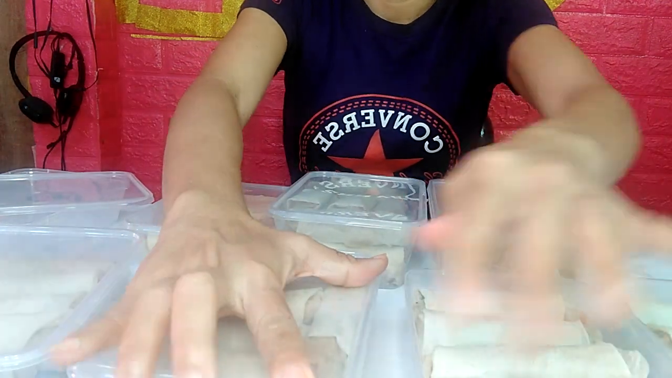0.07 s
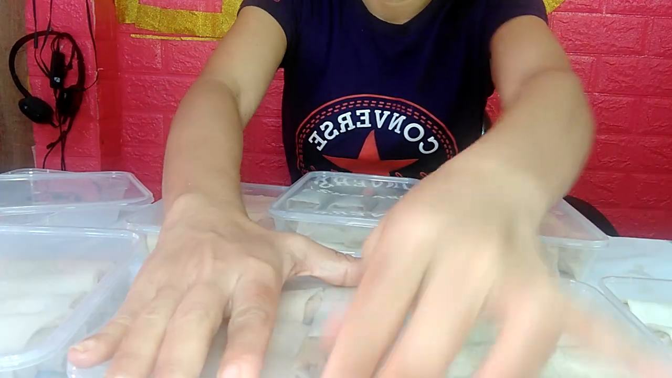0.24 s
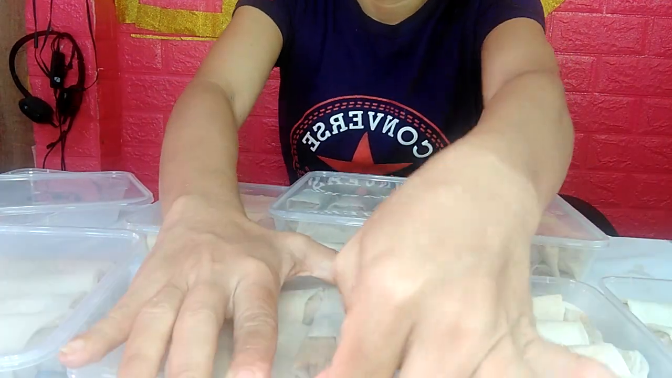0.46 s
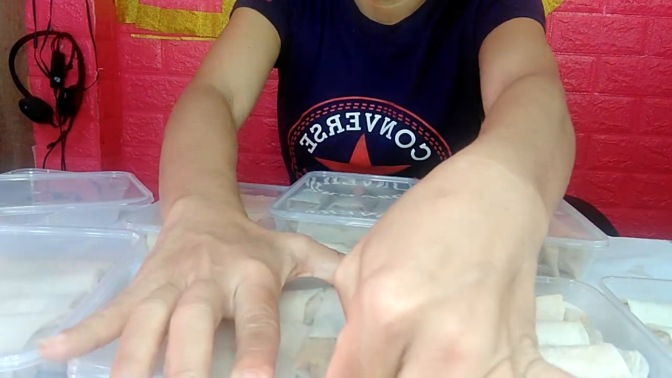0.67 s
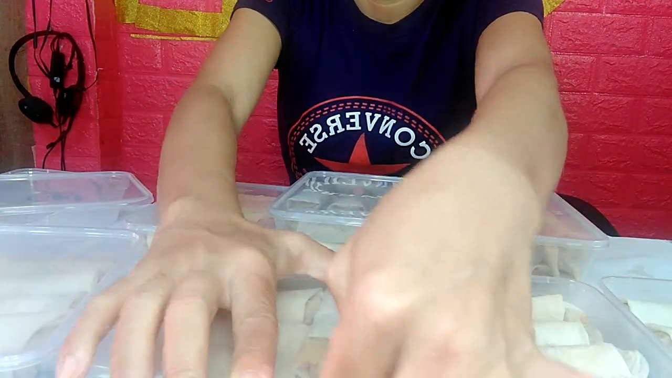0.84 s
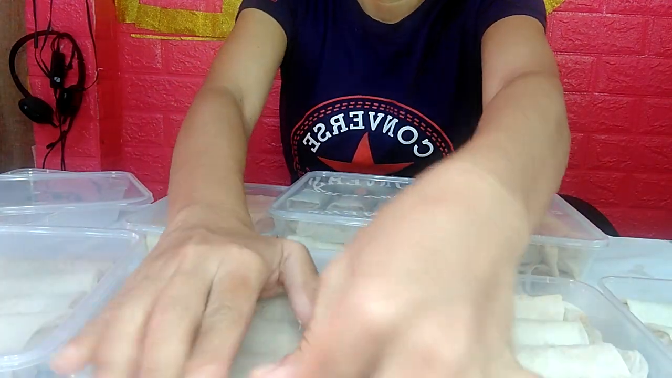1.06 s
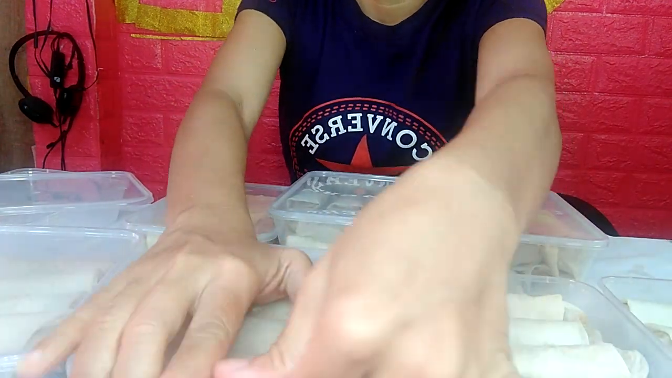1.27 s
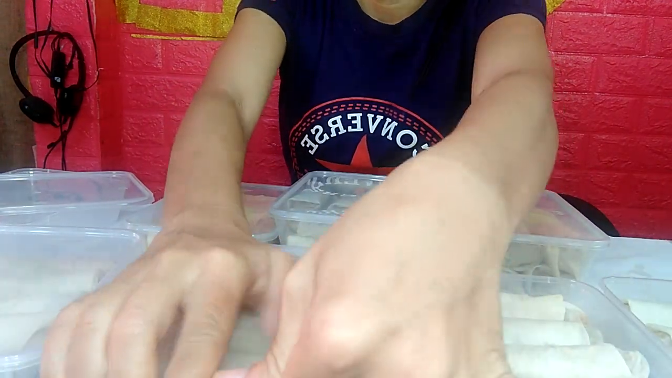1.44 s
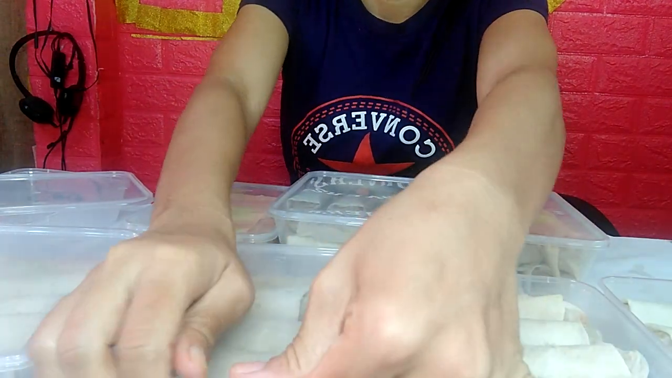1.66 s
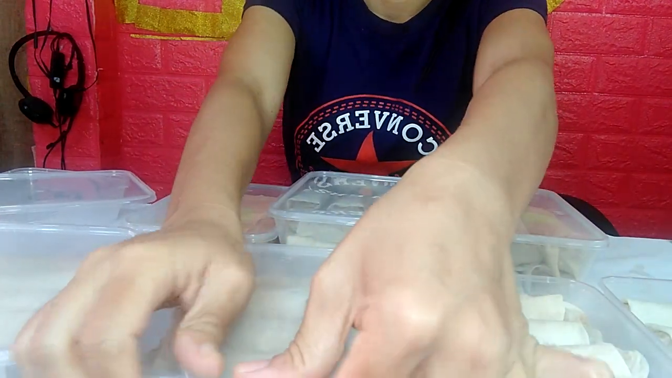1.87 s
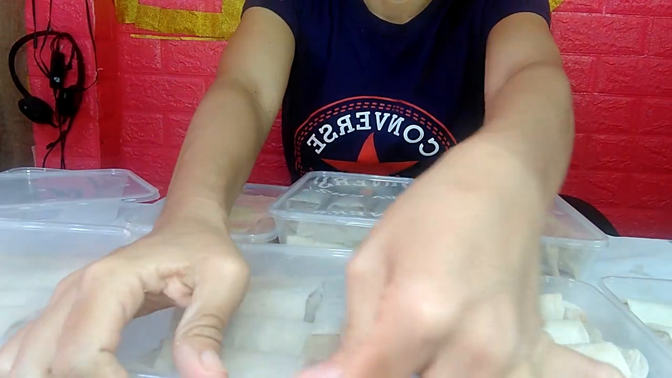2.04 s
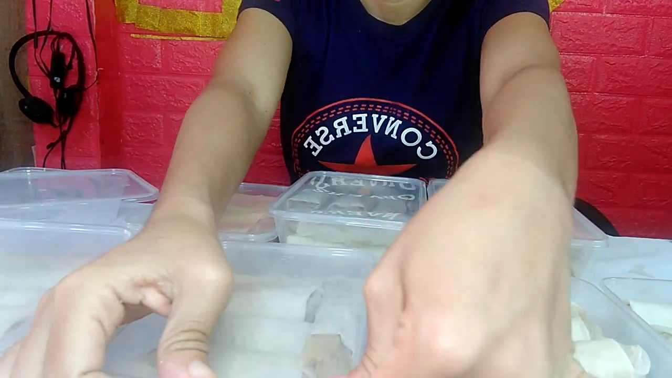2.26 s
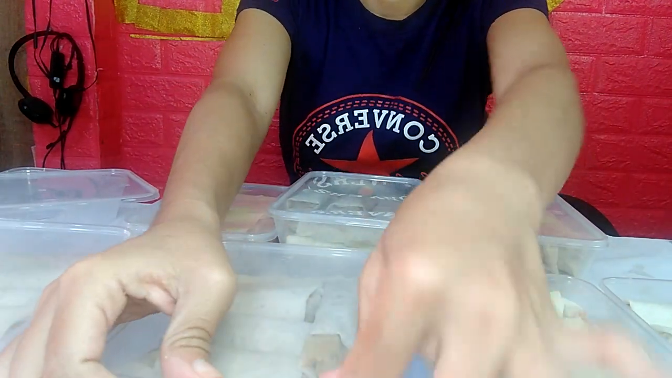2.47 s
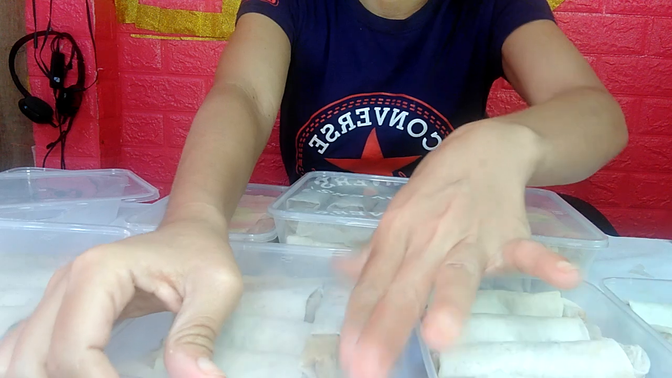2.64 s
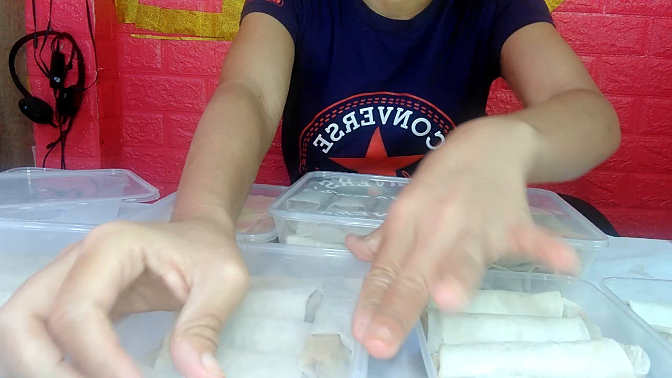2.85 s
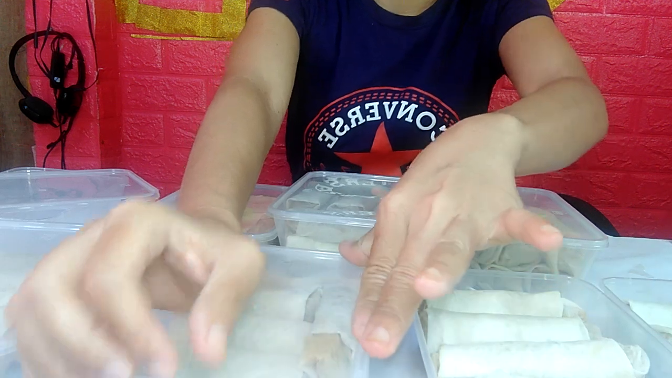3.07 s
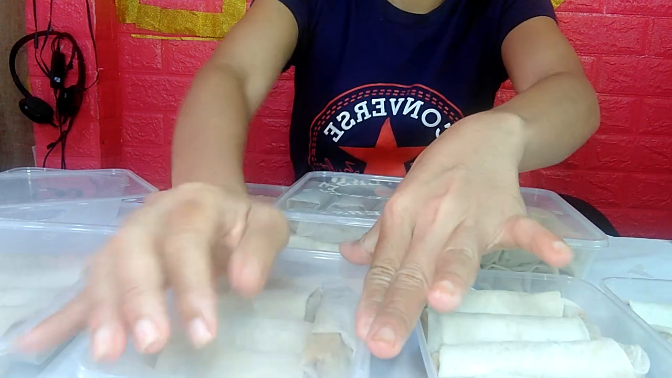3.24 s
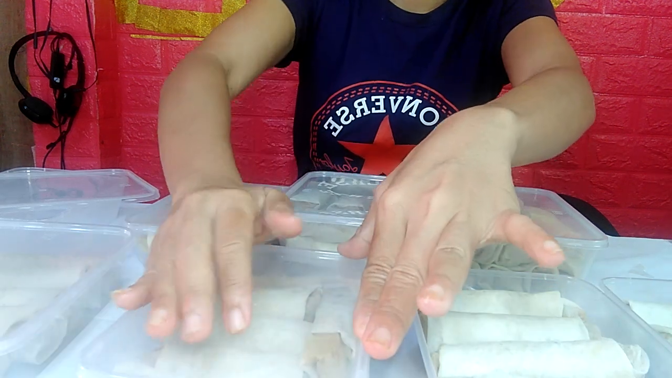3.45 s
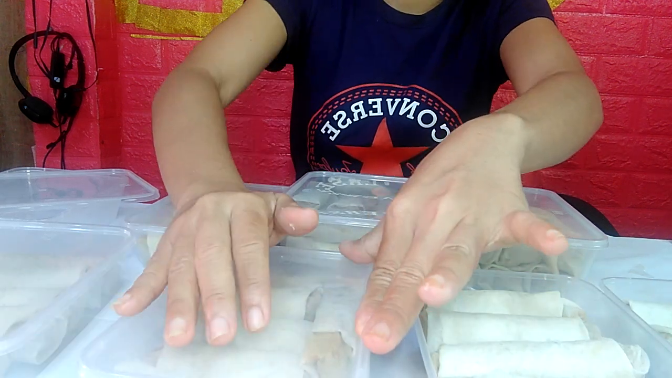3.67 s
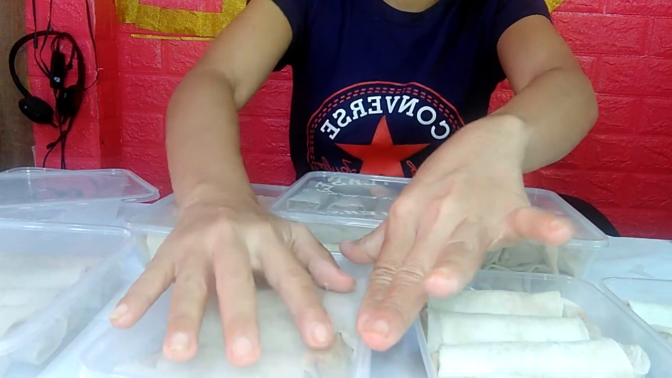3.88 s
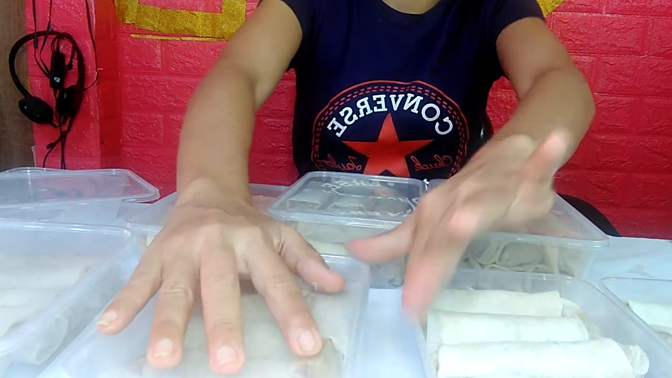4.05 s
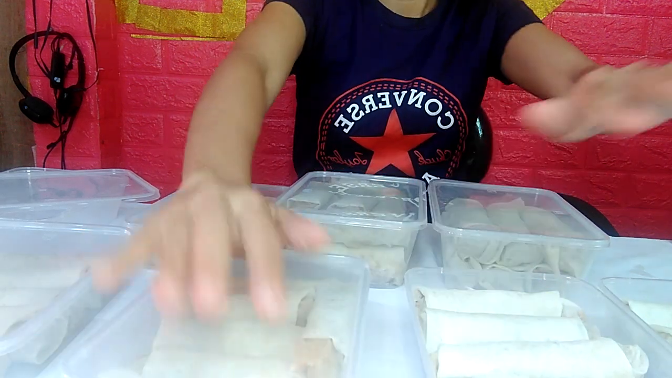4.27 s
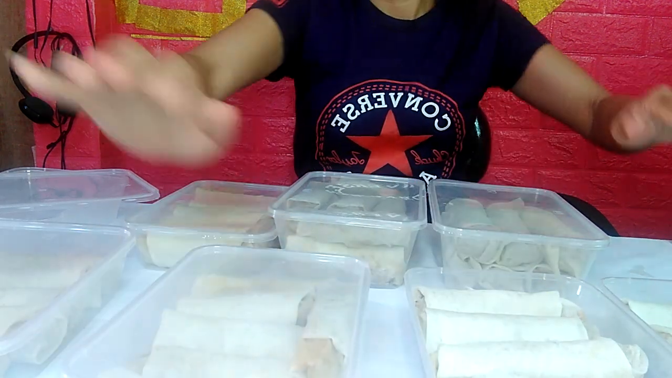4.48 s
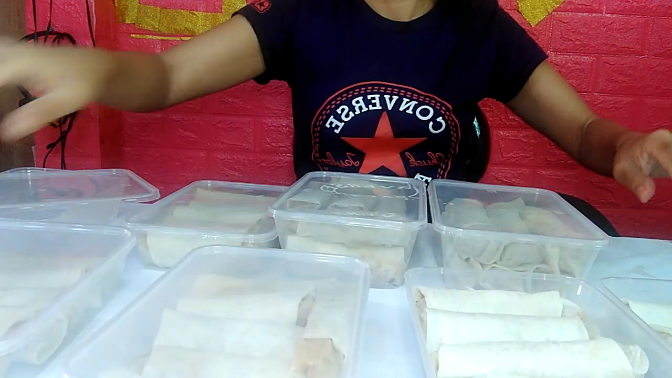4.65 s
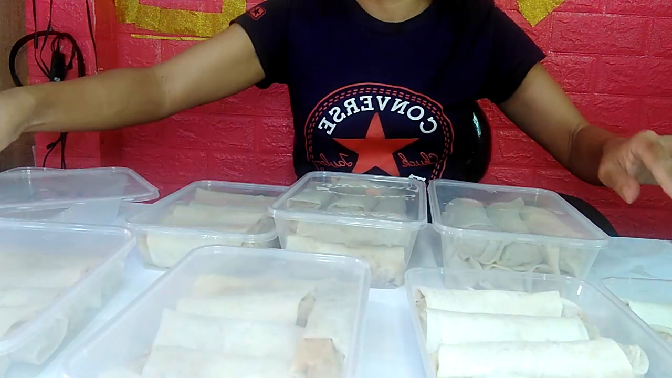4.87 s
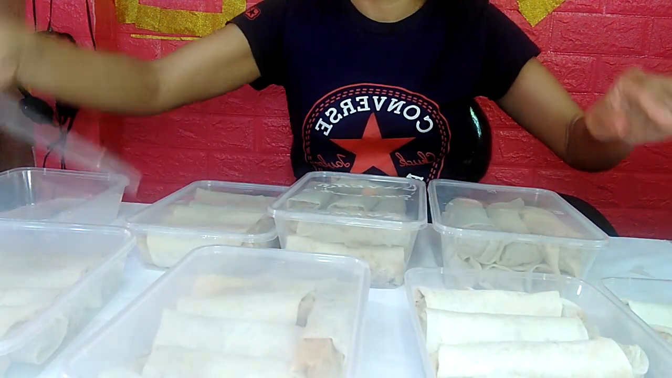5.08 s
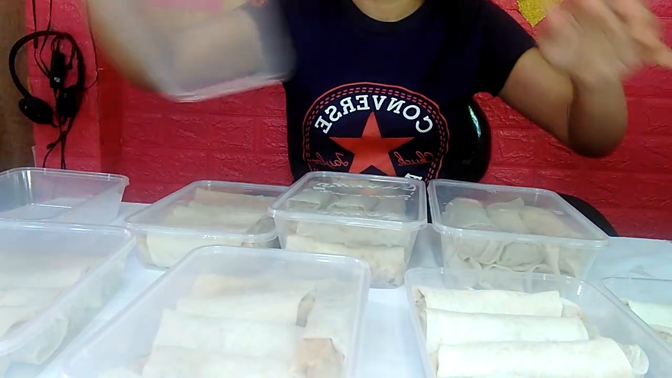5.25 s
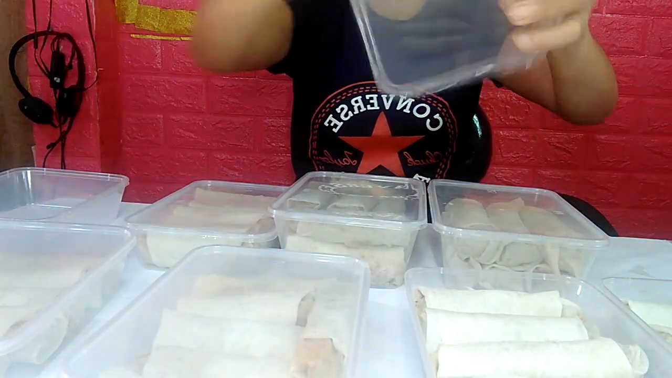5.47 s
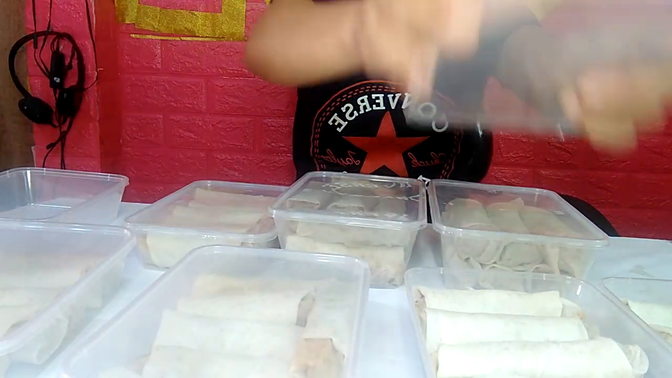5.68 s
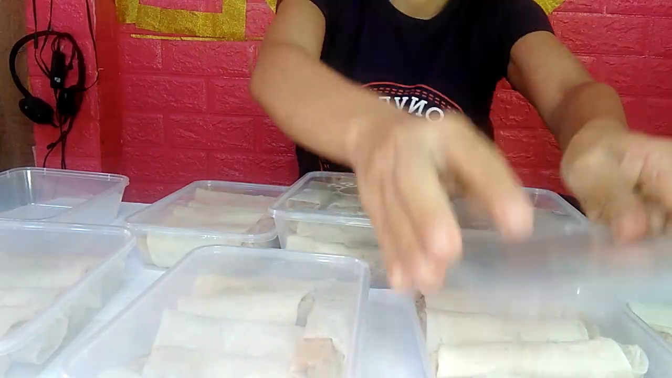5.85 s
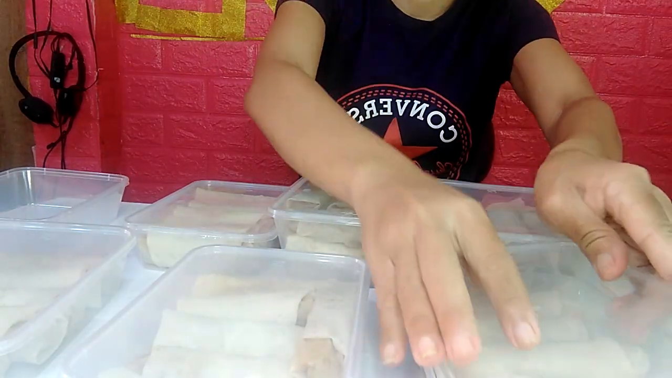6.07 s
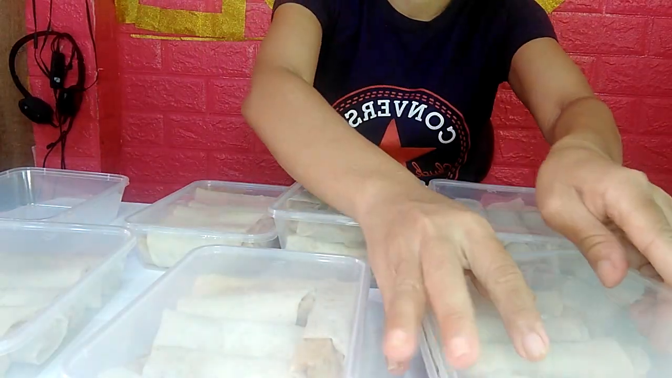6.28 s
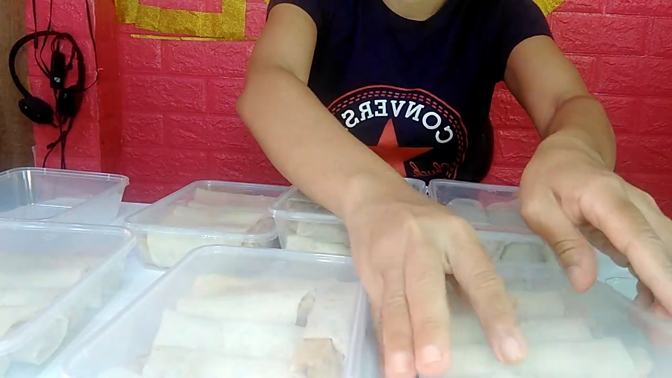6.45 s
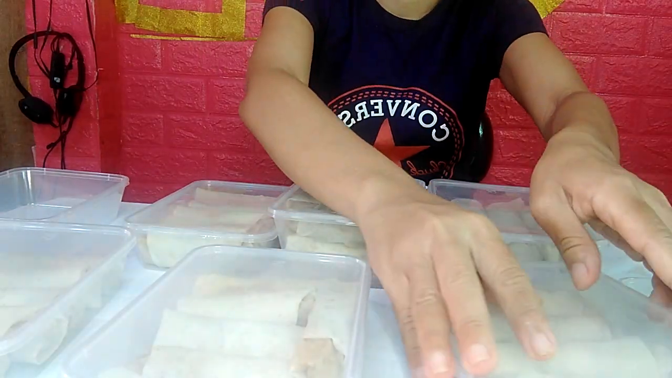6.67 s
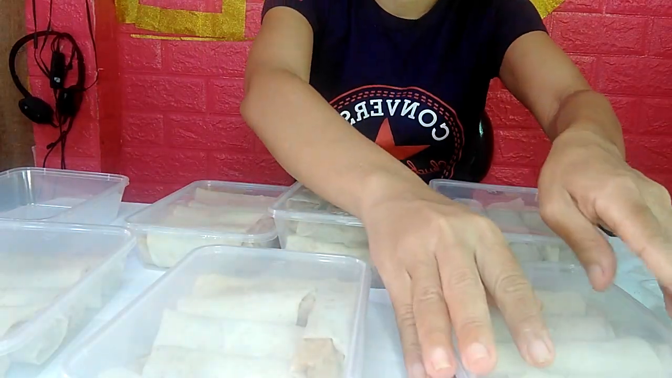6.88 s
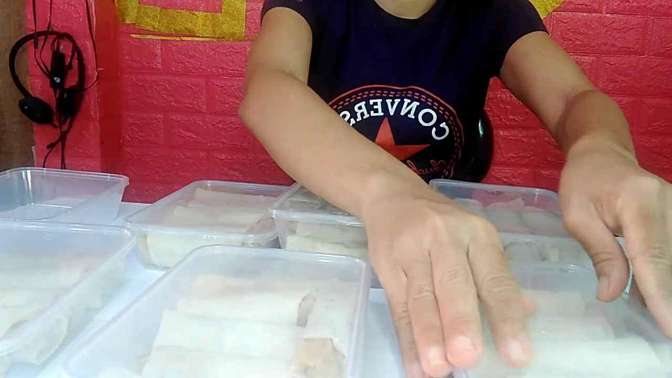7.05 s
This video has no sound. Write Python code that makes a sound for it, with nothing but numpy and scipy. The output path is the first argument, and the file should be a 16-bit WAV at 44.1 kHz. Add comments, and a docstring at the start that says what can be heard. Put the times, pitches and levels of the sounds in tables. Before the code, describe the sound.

Plastic lids click into place on food tubs: a hard snap at once, another soon after, a crackly double snap, then a firm hollow pop. Skin rubs and squeaks faintly on the plastic. Handling fades, low thuds return, and a lid edge ticks and scrapes lightly. Close, bright sound with short indoor reflections and soft room noise.

```python
"""Rims snap and tick into their grooves as hands press thin plastic lids onto food tubs on a table,
close to a small microphone in a hard-walled room. Snaps are short noise bursts rung through lid modes;
hollow knocks are decaying sines; rubs, shifts and scrapes are trains of tiny slips; squeaks are wavering
tones. Near the end a rim is scraped along a tub. Reflections, steady air and a fan's faint whir lie behind."""
import sys
import numpy as np
from scipy import signal
from scipy.fft import rfft, irfft, next_fast_len
from scipy.io import wavfile
from scipy.ndimage import uniform_filter1d

SR = 44100
rng = np.random.default_rng(int(sys.argv[2]) if len(sys.argv) > 2 else 0)


def dump(signal):
    """Clip the signal to [-1, 1] and save it as 16-bit WAV at the path in sys.argv[1]."""
    limited = np.clip(np.atleast_2d(signal).T, -1, 1)
    pcm = np.round(limited * 32767).astype(np.int16)
    wavfile.write(sys.argv[1], SR, pcm)


N = 313991  # length in samples

# Snaps and ticks of a rim. Each row: start in seconds, time scale of the burst in ms, main ring in Hz,
# height of that ring in dB, relative level in dB, treble tilt in dB per octave.
RIM_SNAPS = [ (0.2295, 1.1, 3050, 7, -3, -5), (.236, 1.84, 830, 24, -1.5, -1.5),
             (0.2375, 0.72, 2890, 4.5, 13.5, -2.5), (0.2497, 1, 940, 1, -19, -8),
             (.555, 0.71, 5390, 16, -31, -7.5), (0.651, 1.8, 8440, 23, -37, -5),
             (.7905, 0.77, 1110, 13, 3.5, 0), (.7915, 0.99, 2830, 13, 3, -3),
             (.881, 1.1, 2810, 17.5, -19, -0.5), (0.9267, 0.93, 2980, 15, -20, -1.5),
             (1.096, 2.4, 4680, 26.5, -33, -2.5), (1.33, 3.8, 2200, 21.5, -41, -6),
             (1.44, 4.5, 2000, 26, -42, -4), (1.5485, 0.52, 7500, 9, -14.5, -1.5),
             (1.6076, 0.57, 2100, 20, -20, -12), (1.673, 2, 1000, 16, -20, -3),
             (1.678, 2, 2020, 17.5, -12, 1.5), (1.682, 0.98, 1266, 11, -10, -8.5),
             (1.87, 0.73, 4420, 19.5, -18.5, 1), (1.9856, 0.46, 3140, 22, -25, 0.5),
             (1.987, .6, 4470, 25.5, -27.5, 1), (2.03, 5, 2030, 19.5, -32.5, 1),
             (2.148, 0.28, 6950, 16.5, -26.5, 1.5), (2.1531, 1.7, 4380, 17, -27, 4.5),
             (2.3436, 1.1, 2420, 8.5, 9, -1.5), (2.3574, 4.3, 8450, 5.5, -1.5, 2.5),
             (2.367, 3.6, 2635, 12, -2, -7.5), (2.813, 1.3, 1690, 14, -23.5, -6),
             (3.0575, 0.78, 5290, 8.5, -2.5, 1.5), (3.0667, 1.85, 2000, 6.5, 0.5, -4.5),
             (3.188, 4.4, 3770, 23, -32, 3.5), (3.6567, 1.08, 935, 12.5, -8.5, -6),
             (3.656, 1.6, 10660, 19, -22, 2.5), (3.661, 2.5, 12460, 19, -24, 4),
             (4.1822, 1.64, 1450, 23.5, -28.5, -3), (4.184, 1.3, 5300, 15, -30, 2),
             (5.0078, 1.3, 5050, 16, -33, -1), (5.188, 0.76, 6770, 10, -34.5, 8.5),
             (5.5969, 1.6, 8380, 21.5, -35, 0), (6.0154, 0.85, 3455, 10, -7.5, 1),
             (6.0495, 6.6, 2160, 7, -20.5, -1.5), (6.0729, 2.6, 4090, 17, -22.5, -1),
             (6.335, 1.1, 1950, 29, -32, -3.5), (6.4196, 0.95, 2350, 28.5, -25, 0),
             (6.4465, 0.69, 2540, 28, -24, 3), (6.4686, 1.1, 2700, 10, -25, 3.5),
             (6.4828, 1.2, 2520, 13, -13.5, 2), (6.5303, .54, 2080, 4, -20.5, 1)]
# Colour of the plastic, shared by all snaps. Each row: frequency in Hz, gain in dB.
PLASTIC_COLOUR = [(40, -36), (110, -14.5), (220, -3.5), (400, 2), (700, -2.5), (1000, -1.5), (1700, -1),
                  (2800, -2), (3600, -3.5), (6000, -4), (8400, 4.5), (9600, 1.5), (12400, -2),
                  (14500, -14.5)]
# Hollow knocks of a tub or a flexing lid. Each row: start in seconds, envelope peak in dB before the
# common trim, pitch in Hz.
HOLLOW_KNOCKS = [(.157, -48, 705), (0.236, -27, 186), (.748, -44, 272), (0.78, -39.5, 419),
                 (.82, -31.5, 70), (0.876, -33, 80.6), (1.076, -42.5, 850), (1.096, -38.5, 710),
                 (1.127, -41, 704), (1.225, -40, 263), (1.512, -42, 408), (1.53, -34, 440),
                 (1.608, -34.5, 445), (1.683, -29, 238), (1.686, -34.5, 524), (1.827, -48, 457),
                 (2.098, -45, 660), (2.019, -50, 291), (2.15, -45, 275), (2.348, -23, 261),
                 (2.351, -21.5, 600), (2.379, -31.5, 141), (2.816, -42, 1130), (2.825, -46, 154.7),
                 (3.069, -17, 509), (3.073, -23, 228), (3.287, -44, 140), (3.658, -37.5, 406),
                 (3.711, -32, 150), (4.639, -52.5, 985), (5.105, -47, 70), (5.242, -49.5, 270),
                 (5.369, -43, 247), (5.412, -44.5, 284), (5.427, -24, 116), (5.463, -25.5, 104.3),
                 (5.521, -31, 86), (5.597, -47, 1045), (5.694, -45, 272), (5.741, -42, 269),
                 (5.752, -33.5, 96), (6.187, -49.5, 278), (6.241, -45, 283), (6.397, -34, 105),
                 (7.009, -51.5, 286)]
# Pushes of the hands on a lid. Each row: start in seconds, length in seconds, rubbing in dB, low shifting
# of the tubs in dB, both before the common trims.
HAND_PUSHES = [(0.06, 0.32, -54.5, -70), (0.676, 0.11, -52.5, -78), (.82, 0.097, -48, -52.5),
               (1.041, 0.07, -48, -54), (1.179, 0.19, -54.5, -59), (1.467, 0.35, -49, -51.5),
               (1.995, 0.16, -55, -59.5), (2.365, 0.14, -53.5, -48), (2.785, .2, -54, -56),
               (3.126, 0.23, -58, -62.5), (3.695, 0.24, -60.5, -51.5), (4.296, 0.068, -65, -80),
               (4.457, 0.049, -62, -80.5), (4.956, .15, -69.5, -69), (5.25, 0.39, -61, -64.5),
               (5.71, 0.14, -58.5, -51.5), (5.999, 0.082, -51.5, -65), (6.141, 0.21, -60.5, -62.5),
               (6.393, .16, -63.5, -53), (6.956, 0.18, -65.5, -64)]
# Colour of fingers rubbing on lids. Each row: frequency in Hz, relative level in dB.
RUB_COLOUR = [(100, -17), (260, -2.5), (450, 9), (800, 1), (1200, 4), (1600, -13.5), (2100, -7),
              (3000, -11), (6000, -20), (12000, -48)]
# Colour of tubs shifting on the table. Each row: frequency in Hz, relative level in dB.
SHIFT_COLOUR = [(20, -50), (38, -14.5), (60, 5.5), (120, 0.5), (190, -7), (400, -33.5), (1500, -62)]
# Drags of a rim along the edge of a tub. Each row: start in seconds, length in seconds, level in dB before
# the common trim, share of bright chatter from 0 to 1.
RIM_DRAGS = [(6.234, 0.023, -52, 0.25), (6.331, 0.0066, -39, 0.04), (6.342, 0.0081, -51, 0),
             (6.41, 0.018, -42, 0.2), (6.443, 0.032, -35.5, 1), (6.48, 0.0075, -31, 1),
             (6.488, 0.058, -44.5, 0.84)]
# Colour of the rim ringing under a drag. Each row: frequency in Hz, relative level in dB.
RIM_COLOUR = [(300, -23), (1000, -25), (1400, -27), (1700, 8), (2000, 7), (2600, -23), (3200, -31),
              (4100, -18), (5500, -39), (15000, -43)]
# Colour of the bright chatter of a drag. Each row: frequency in Hz, relative level in dB.
CHATTER_COLOUR = [(300, -23), (1300, -15), (1800, 13.5), (2700, 7), (3200, -13), (4300, 8), (5800, 4),
                  (7800, 7.5), (9500, -2.5), (15500, -40)]
# Thin squeaks of skin on a lid. Each row: start in seconds, length in seconds, level in dB before the trim.
SKIN_SQUEAKS = [(2.669, 0.16, -60), (2.88, 0.17, -61.5), (3.13, 0.052, -56.5), (3.339, .12, -72.5)]
# Decay of the room's late tail. Each row: frequency in Hz, time to fall by 60 dB in seconds.
ROOM_DECAY = [(70, 0.97), (150, 0.51), (400, 0.36), (1000, 0.33), (2800, 0.31), (7500, 0.26), (14000, 0.32)]
# Colour of the still air. Each row: frequency in Hz, relative level in dB per Hz.
AIR_COLOUR = [(20, -17.5), (45, 3.5), (65, 0), (92, -14.5), (125, -3.5), (190, -13.5), (265, 1), (370, -20),
              (650, -8), (850, -13.5), (2200, -14), (5000, -22), (6800, -24), (7900, -20), (10000, -32.5),
              (15000, -50.5)]

TILT_PIVOT_HZ, TILT_FROM_HZ = 2270, 900  # below TILT_FROM_HZ the tilt grows no further
DULL_FROM_HZ, DULL_FULL_HZ, DULL_DB = 7330, 11570, -14.5  # the soft plastic rounds off every click
RING_WIDTH_HZ, RING_WIDTH_SHARE = 260, .05  # the main ring is wider the higher it lies
MODES_MERGE_HZ = 11500  # around here the modes begin to overlap and no longer ring apart
ONE_CYCLE_HZ, CYCLES_POWER = 76, .65  # small, high panels swing for more cycles than large ones
LIGHT_KNOCK_DB, DAMPING_DB = -38, 29  # a firmer hand damps: DAMPING_DB more shortens by a factor e
PUSH_ATTACK_S, PUSH_RELEASE_S = 0.019, 0.039
LET_GO_S = 4.1  # until then the hands rest on the lids and never keep quite still
REST_RUB_DB, REST_SHIFT_DB = -63, -71.5  # before the common trims
DRAG_ATTACK_S, DRAG_RELEASE_S = 0.0024, 0.003
SQUEAK_HZ, SQUEAK_RISE_HZ_PER_S = 7900, 220  # the pitch creeps up from squeak to squeak
SQUEAK_ATTACK_S, SQUEAK_RELEASE_S = 0.011, .02
AIR_DB, AIR_TRIM_DB = -65.5, -1.0  # air level before its trim
FAN_HZ, FAN_DB = 1011, -79.5
EDGE_HZ = 15900  # upper band limit of the recorder


def snaps(ripple_db=29, mode_gap_hz=760, mode_width_hz=120, hard_db=12, soft_db=-14, size=2048):
    """A rim jumps its catch: a brief noise burst, coloured by the patch of lid that rings."""
    out = np.zeros(N)
    t, hz = np.arange(size) / SR, np.fft.rfftfreq(size, 1 / SR)
    lead = size // 16  # samples kept free ahead of the blow
    octaves = np.log2(np.maximum(hz, TILT_FROM_HZ) / TILT_PIVOT_HZ)
    dulling = read([(DULL_FROM_HZ, 0), (DULL_FULL_HZ, DULL_DB)], hz)
    shared = read(PLASTIC_COLOUR, hz) + dulling
    for start, ms, ring_hz, ring_db, level_db, tilt_db in RIM_SNAPS:
        u = t / (max(ms, .1) / 1000)
        burst = rfft(rng.standard_normal(size) * np.sqrt(u) * np.exp(-1.5 * u))
        # level the burst's spectrum, so that the colour below decides it
        burst /= np.sqrt(uniform_filter1d(abs(burst) ** 2, size=25) + 1e-12)

        # hard snaps shake the whole lid; soft ticks ring a few separate modes
        soft = np.clip((hard_db - level_db) / (hard_db - soft_db), .3, 1)
        scatter = rng.random(40) - rng.random(40)
        modes_hz = ring_hz + mode_gap_hz * (np.arange(-20, 20) + scatter)
        strengths = rng.uniform(.4, 1.5, 40)
        peaks = 1 / (1 + ((hz[:, None] - modes_hz) / mode_width_hz) ** 2)
        modes = np.sqrt(peaks @ strengths)
        ripple = np.minimum(ripple_db * (modes - uniform_filter1d(modes, size=101)), 11)
        ripple /= 1 + (hz / MODES_MERGE_HZ) ** 4

        # one broad resonance stands out and swallows the modes under it
        width_hz = RING_WIDTH_HZ + RING_WIDTH_SHARE * ring_hz
        main = 1 / (1 + ((hz - ring_hz) / width_hz) ** 2)
        colour = shared + level_db + tilt_db * octaves
        colour += ring_db * main + soft * (1 - main) * ripple
        click = irfft(burst * causal(colour))
        add(out, start - lead / SR, np.roll(click, lead))
    return out


def knocks(level_db=-2, overtone=1.756, overtone_db=-10):
    """A broad panel flexes for a few cycles, with a weaker second mode."""
    out, t = np.zeros(N), np.arange(SR // 5) / SR
    for start, db, hz in HOLLOW_KNOCKS:
        damping = np.exp((LIGHT_KNOCK_DB - db) / DAMPING_DB)
        cycles = (hz / ONE_CYCLE_HZ) ** CYCLES_POWER * damping
        u = 2 * t * hz / cycles
        swell = u * np.exp(1 - u)  # peaks at 1
        second_hz = hz * overtone * np.exp(rng.standard_normal() / 10)
        first = np.sin(2 * np.pi * hz * t)
        second = amp(overtone_db) * np.sin(2 * np.pi * second_hz * t)
        add(out, start, amp(db + level_db) * swell * (first + second))
    return out


def handling(rub_db=-4, shift_db=-4):
    """Fingers drag over the lids in small creaks while the tubs shift on the table."""
    rubbing, shifting = np.zeros(N), np.zeros(N)
    resting = (0, LET_GO_S, REST_RUB_DB, REST_SHIFT_DB)
    for start, length, rubbing_db, shifting_db in HAND_PUSHES + [resting]:
        force = stroke(start, length, PUSH_ATTACK_S, PUSH_RELEASE_S)
        rubbing = np.maximum(rubbing, amp(rubbing_db) * force)
        shifting = np.maximum(shifting, amp(shifting_db) * force)
    fine_creaks = creaks(low=217.4, high=5350, per_s=380, ring_s=0.013, spread_db=5.5)
    rub = coloured(fine_creaks, RUB_COLOUR)
    shift = coloured(slips(per_s=110, spread_db=-0.5), SHIFT_COLOUR)
    return amp(rub_db) * rubbing * rub + amp(shift_db) * shifting * shift


def creaks(low, high, per_s, ring_s, spread_db, count=36):
    """Tiny slips, each ringing one of many panel modes for a moment."""
    out, t = np.zeros(N), np.arange(SR // 10) / SR
    # the modes lie a little below an even ladder from low to high, each by its own share
    modes_hz = np.geomspace(low, high, count) * rng.uniform(0.91, 0.95, count)
    u = t / ring_s
    rings = u * np.exp(-u) * np.sin(2 * np.pi * modes_hz[:, None] * t)
    mode = rng.integers(0, count, N)
    size_db = spread_db * np.minimum(rng.exponential(1, N), 3)
    for i in np.flatnonzero(rng.random(N) < per_s / SR):
        add(out, i / SR, amp(size_db[i]) * rings[mode[i]])
    return out


def scrape(level_db=-2):
    """Quick slips ring the rim; each drag has its own share of bright chatter."""
    out = np.zeros(N)
    jolts = slips(per_s=2000, spread_db=2.5)
    rim, chatter = coloured(jolts, RIM_COLOUR), coloured(jolts, CHATTER_COLOUR)
    for start, length, db, bright in RIM_DRAGS:
        bright = np.clip(bright, 0, 1)
        level = amp(db + level_db) * stroke(start, length, DRAG_ATTACK_S, DRAG_RELEASE_S)
        out += level * ((1 - bright) * rim + bright * chatter)
    return out


def squeak(level_db=-2, jitter=0.0125, flutter_db=3):
    """Skin sticks and slips on a lid as a fast tone, unsteady in pitch and level."""
    force = np.zeros(N)
    for start, length, db in SKIN_SQUEAKS:
        force += amp(db) * stroke(start, length, SQUEAK_ATTACK_S, SQUEAK_RELEASE_S)
    since_first = np.arange(N) / SR - SKIN_SQUEAKS[0][0]
    waver, grip = (evened(uniform_filter1d(rng.standard_normal(N), size=260)) for _ in range(2))
    hz = (SQUEAK_HZ + SQUEAK_RISE_HZ_PER_S * since_first) * (1 + jitter * waver)
    tone = np.sin(2 * np.pi * np.cumsum(hz) / SR)
    return force * amp(level_db + flutter_db * grip) * tone


def reflections(x, turn_s=1.536, count=3):
    """The hands move about, so the sound fades in a cycle between three patterns of reflections."""
    place = np.arange(N) / SR / turn_s
    out = np.zeros(N)
    for k in range(count):
        away = abs((place - k / count + .5) % 1 - .5) * count  # in steps from pattern k
        share = np.cos(np.pi / 2 * np.minimum(away, 1))
        out += room(x * share, early_db=-3.5, early_s=.025, late_db=-11.0)
    return out


def room(x, early_db, early_s, late_db, gap_s=0.00089, far_s=0.053, far_spread_s=0.058, far_db=-16):
    """Tubs, table and near walls scatter an early cloud, the far wall a later one; a tail dies by band."""
    t = np.arange(SR) / SR
    early = cloud(np.clip(t / gap_s - 1, 0, 1) * np.exp(-(t / early_s) ** 2))
    far = cloud(np.exp(-((t - far_s) / far_spread_s) ** 2))
    hz, frame_s, bands = signal.stft(rng.standard_normal(SR), SR, nperseg=256)
    decay = amp(-60 * frame_s / read(ROOM_DECAY, hz)[:, None])
    late = signal.istft(bands * decay, SR, nperseg=256)[1][:SR]
    late *= np.clip(t / early_s, 0, 1)
    late /= np.linalg.norm(late)
    response = amp(early_db) * early + amp(far_db) * far + amp(late_db) * late
    return signal.fftconvolve(x, response)[:N]


def cloud(envelope):
    """A dense, nearly colourless cluster of reflections under this envelope, with energy 1."""
    sparse = rng.standard_normal(SR) * (rng.random(SR) < 6000 / SR)
    taps = rfft(sparse * envelope)
    flat = irfft(taps / np.sqrt(uniform_filter1d(abs(taps) ** 2, size=241) + 1e-12), SR)
    flat *= envelope > envelope.max() / 1000  # nothing outside the envelope
    return flat / np.linalg.norm(flat)


def still_room(fan_width_hz=25):
    """Steady coloured air noise, and a fan's narrow whir from noise through a resonance."""
    air = coloured(rng.standard_normal(N), AIR_COLOUR)
    b, a = signal.iirpeak(FAN_HZ, FAN_HZ / fan_width_hz, fs=SR)
    whir = evened(signal.lfilter(b, a, rng.standard_normal(N)))
    return amp(AIR_DB + AIR_TRIM_DB) * air + amp(FAN_DB) * whir


def slips(per_s, spread_db):
    """Random tiny stick-slip jolts of either sign and unequal size, at rms 1."""
    size = amp(spread_db * np.minimum(rng.exponential(1, N), 3))
    happens = rng.random(N) < per_s / SR
    return evened(size * rng.choice([-1, 1], N) * happens)


def stroke(start, length, attack_s, release_s):
    """Envelope of one movement: it rises, holds to the end of its length and dies away."""
    t = np.arange(N) / SR - start
    rise = np.clip(t / attack_s, 0, 1)
    return rise * np.exp(-np.clip(t - length, 0, 20 * release_s) / release_s)


def coloured(x, points):
    """Filters x by a gain curve and scales it to rms 1."""
    size = next_fast_len(N, real=True)
    gain = amp(read(points, np.fft.rfftfreq(size, 1 / SR)))
    return evened(irfft(rfft(x, size) * gain, size)[:N])


def causal(db):
    """Minimum-phase response with these gains: it rings only after the blow."""
    log_gain = np.log(amp(np.r_[db, db[-2:0:-1]]))
    return np.exp(np.conj(signal.hilbert(log_gain)))[:len(db)]


def read(points, hz):
    """Reads a curve on a log-frequency axis."""
    f, value = np.transpose(points)
    return np.interp(np.log(hz + 1), np.log(f + 1), value)


def add(mix, start, sound):
    """Mixes a sound in at a start time in seconds."""
    part = mix[max(round(start * SR), 0):][:len(sound)]
    part += sound[:len(part)]


def amp(db):
    """Decibels to gain."""
    return 10 ** (np.asarray(db) / 20)


def evened(x):
    """Scales to rms 1."""
    return x / np.sqrt(np.mean(x ** 2) + 1e-20)


def scene():
    """All the plastic sounds, their reflections and the still room."""
    bright = snaps() + scrape() + squeak()
    dull = knocks() + handling()
    walls = reflections(bright) + room(dull, early_db=-9.5, early_s=0.021, late_db=-9.5)
    return (bright + dull + walls + still_room())[None]


def record(dry, low_cut_hz=48):
    """The small microphone loses the deepest bass; then the recorder's band limit."""
    low_cut = signal.butter(N=3, Wn=low_cut_hz, btype="high", fs=SR, output="sos")
    thin = signal.sosfilt(low_cut, dry)
    band_limit = signal.firwin(511, EDGE_HZ, window=("kaiser", 9), fs=SR)
    return signal.oaconvolve(thin, band_limit[None], "same")


dry = scene()
out = record(dry)
dump(out)
```